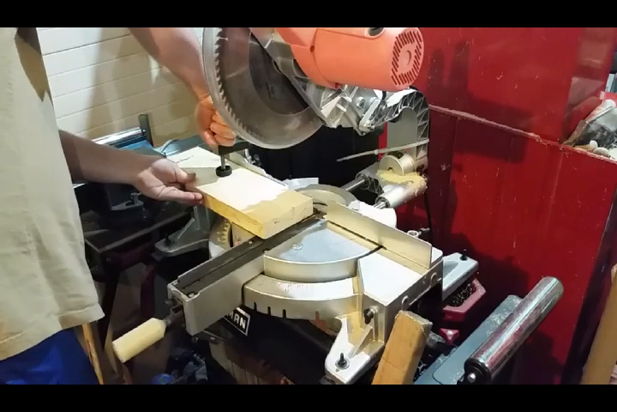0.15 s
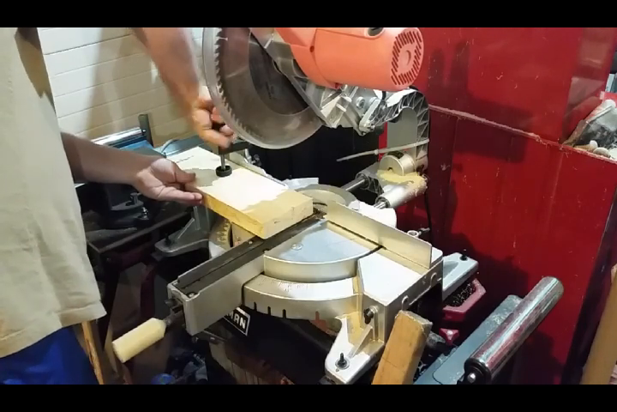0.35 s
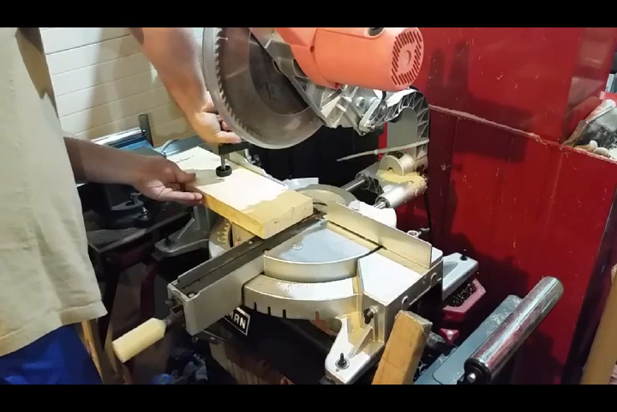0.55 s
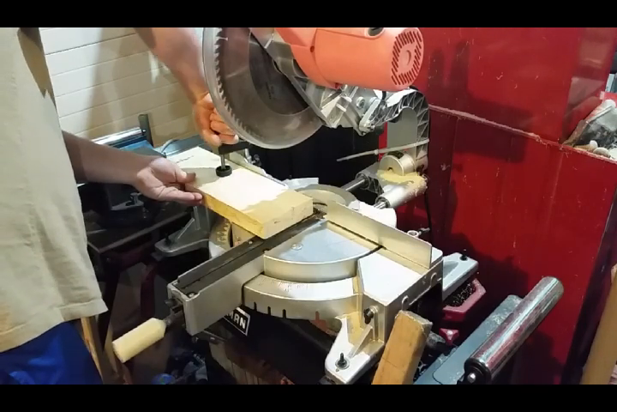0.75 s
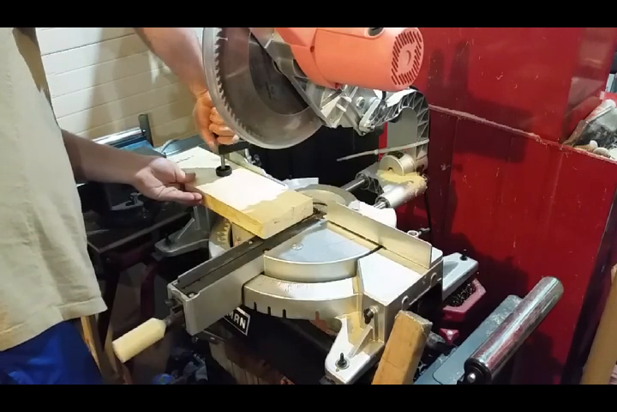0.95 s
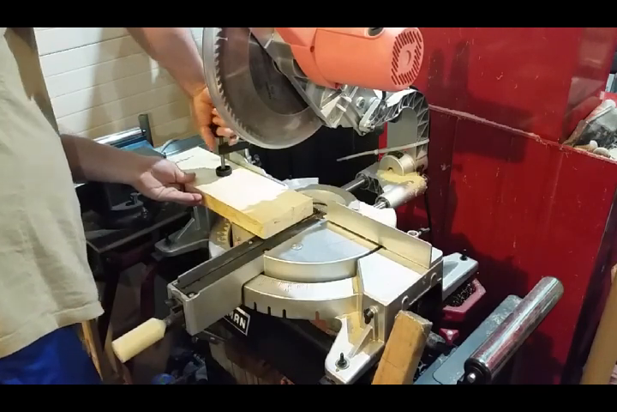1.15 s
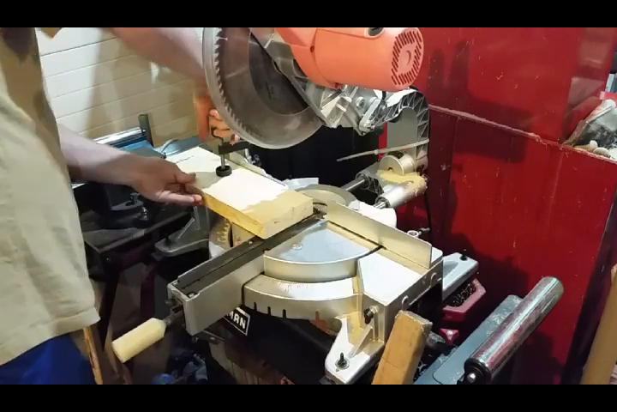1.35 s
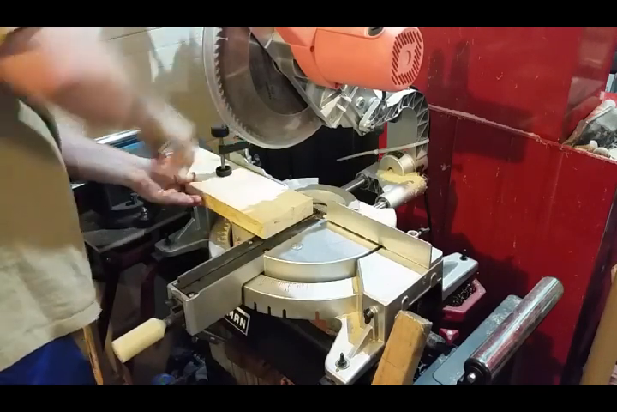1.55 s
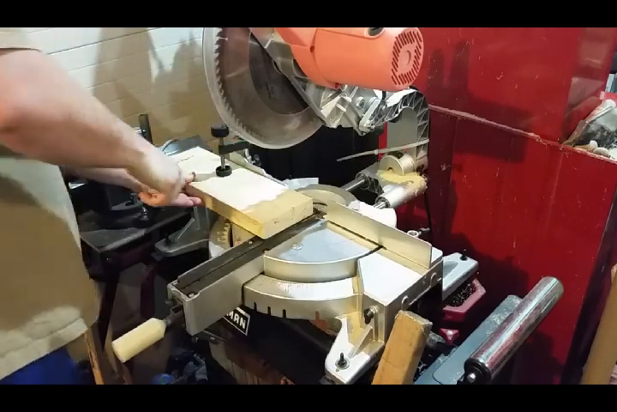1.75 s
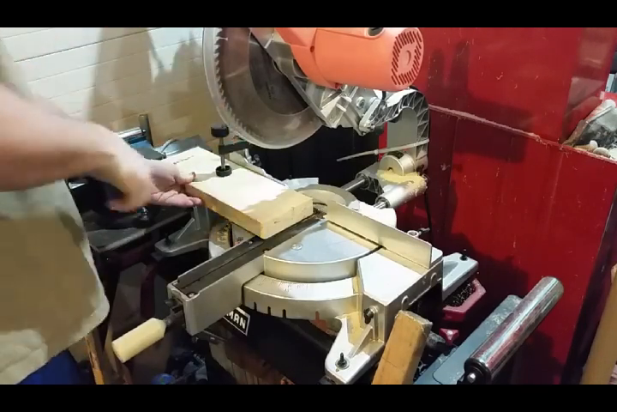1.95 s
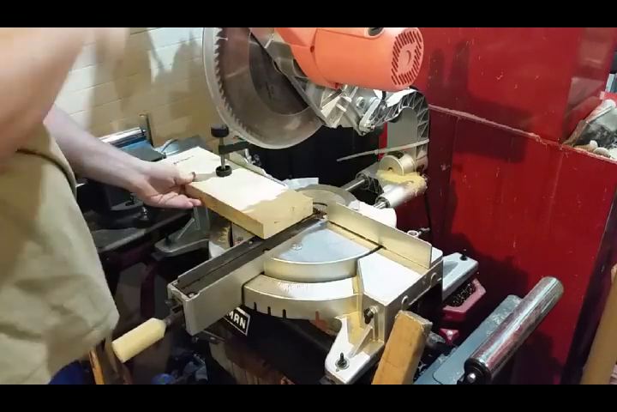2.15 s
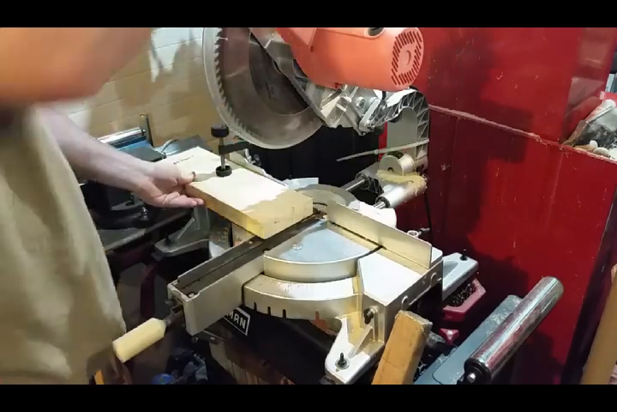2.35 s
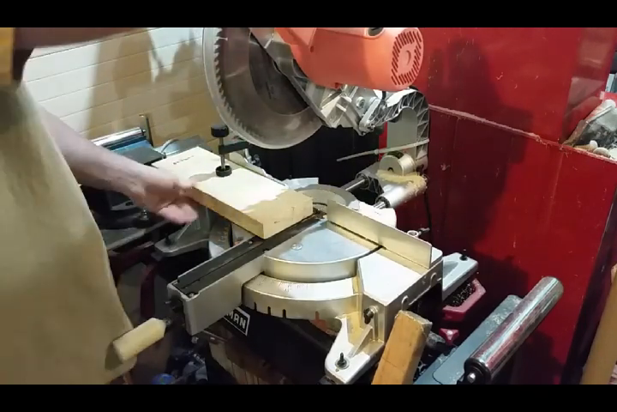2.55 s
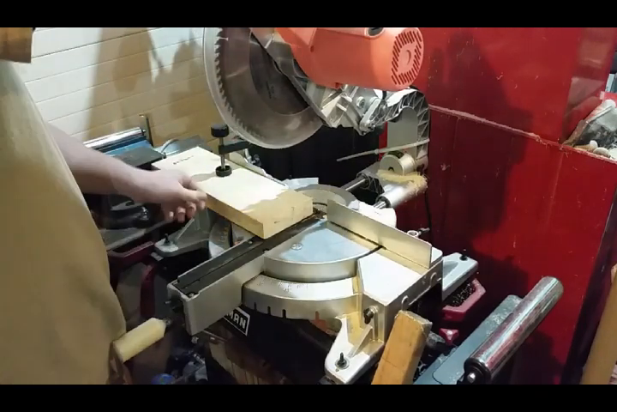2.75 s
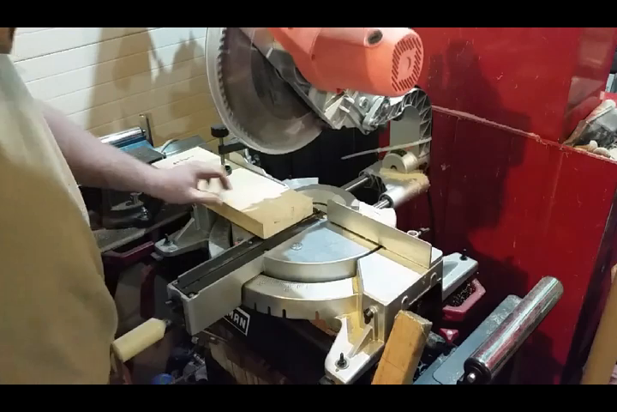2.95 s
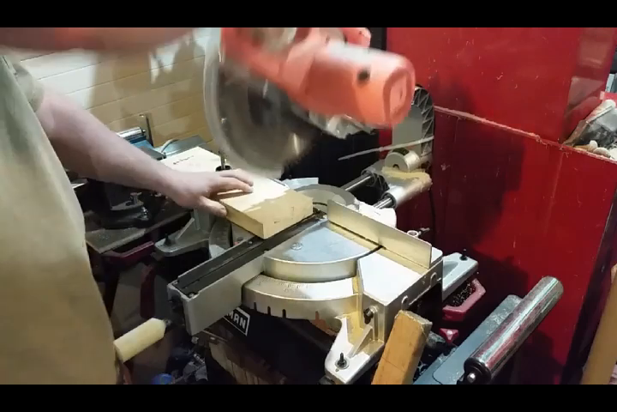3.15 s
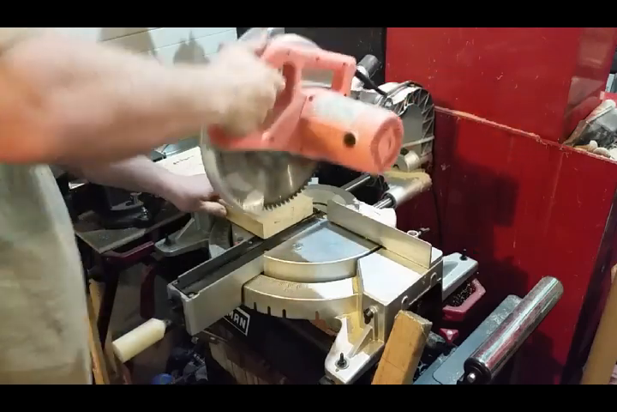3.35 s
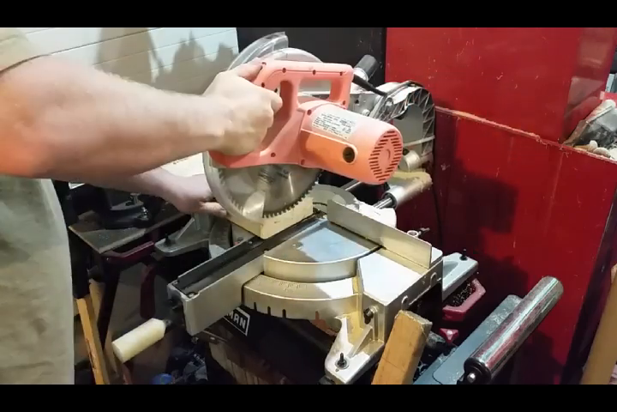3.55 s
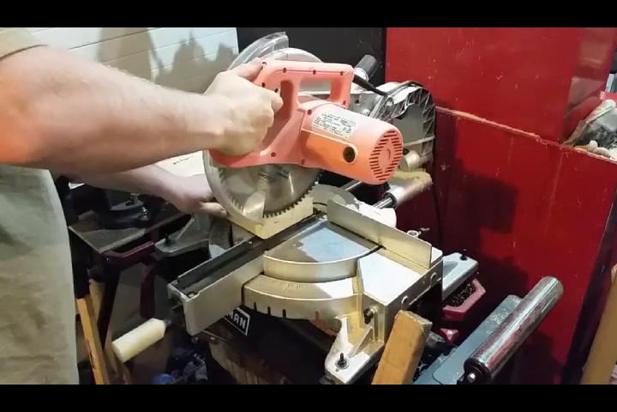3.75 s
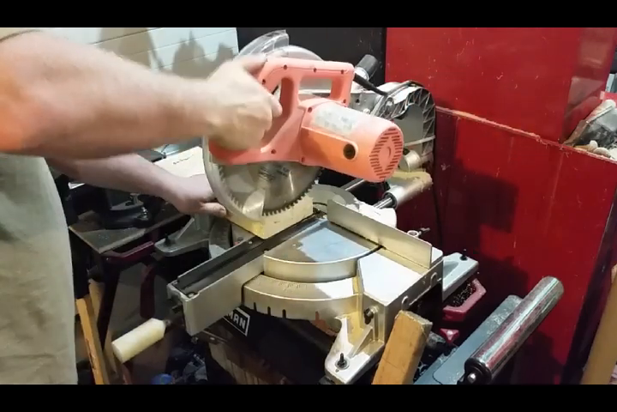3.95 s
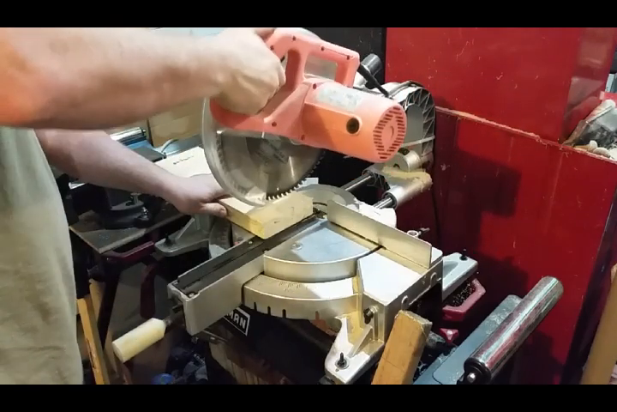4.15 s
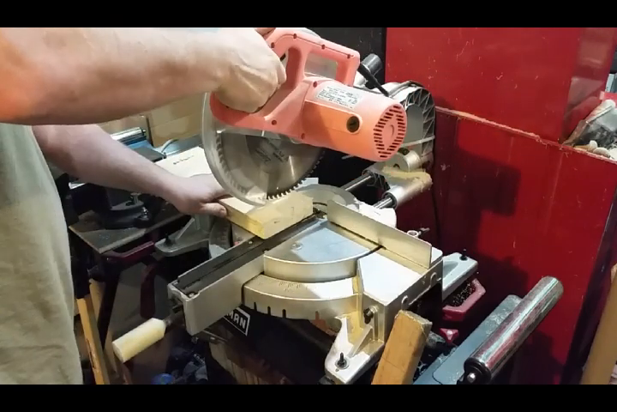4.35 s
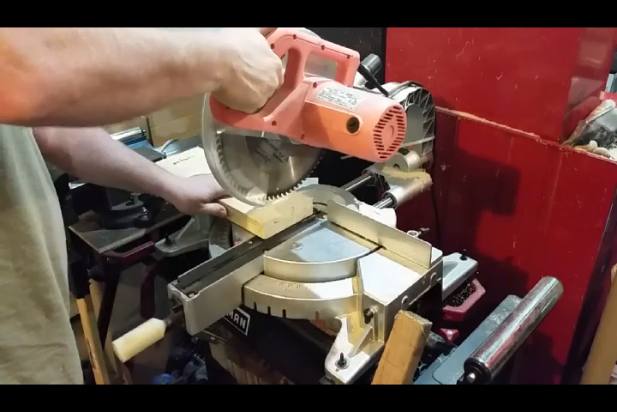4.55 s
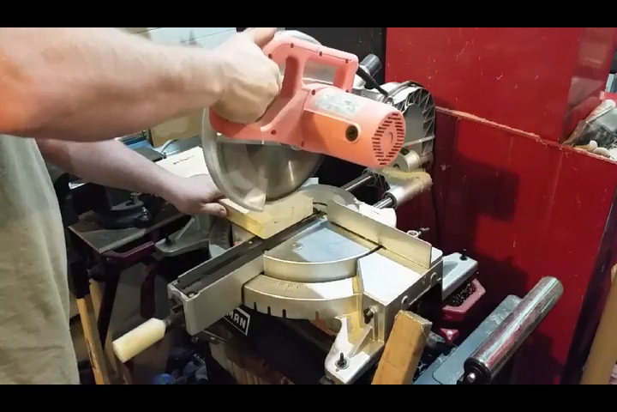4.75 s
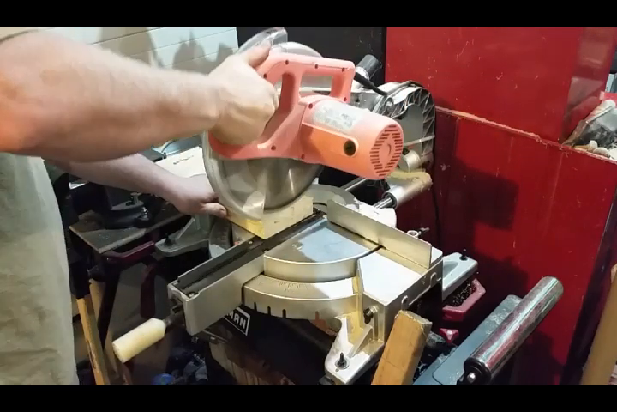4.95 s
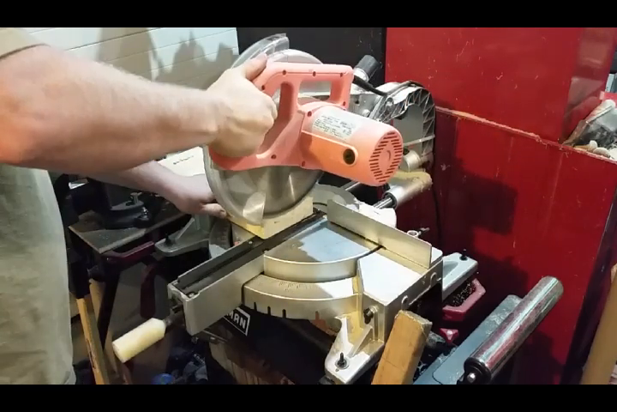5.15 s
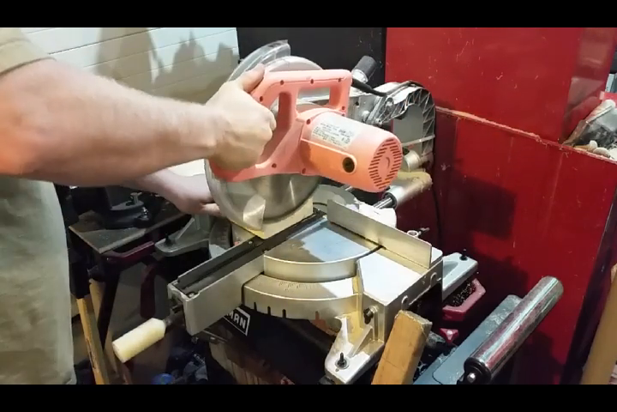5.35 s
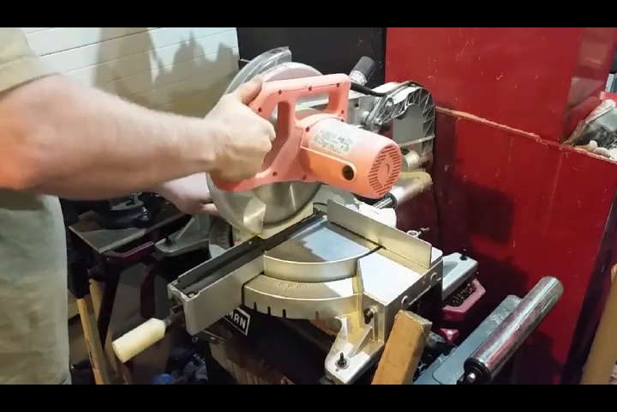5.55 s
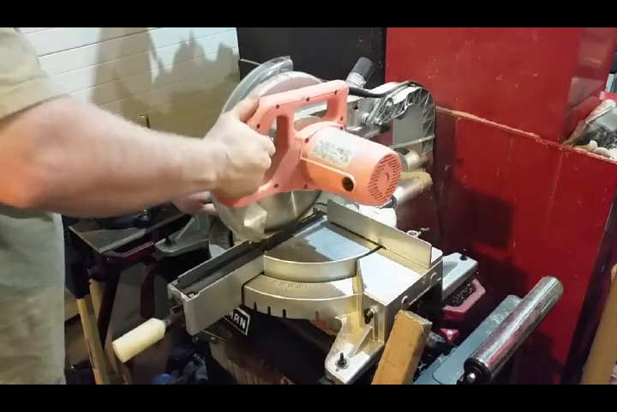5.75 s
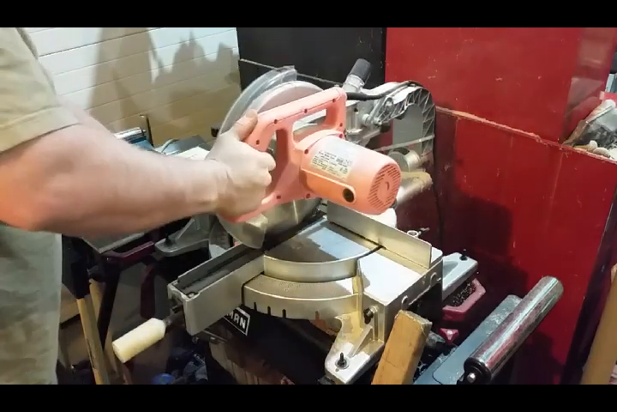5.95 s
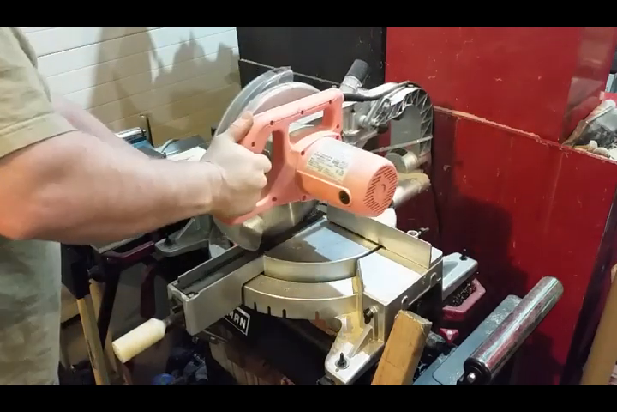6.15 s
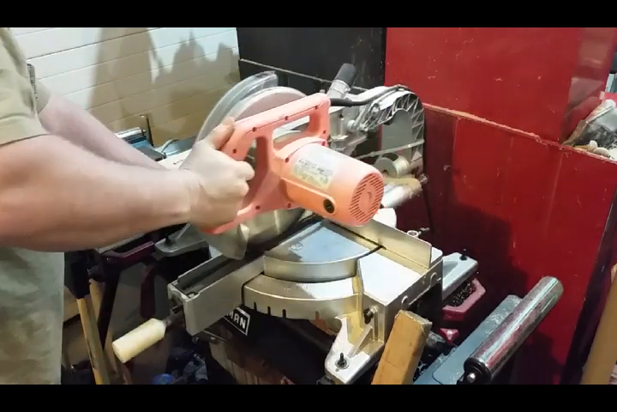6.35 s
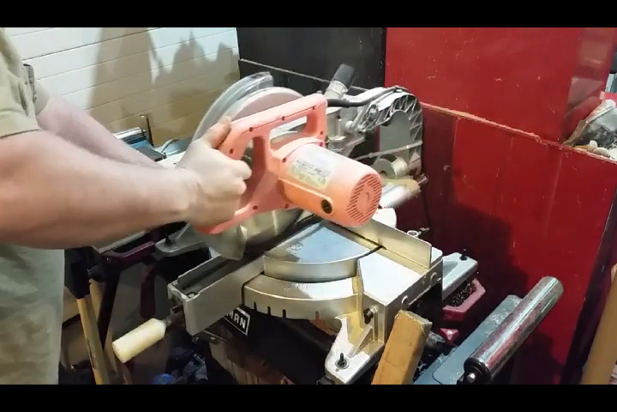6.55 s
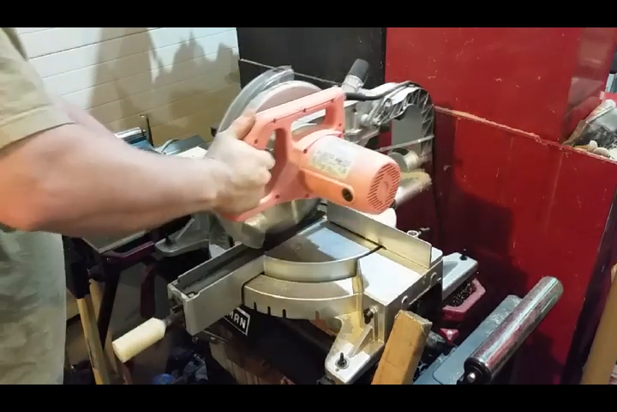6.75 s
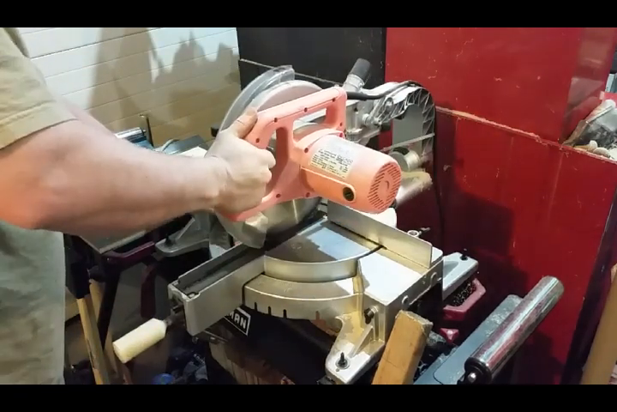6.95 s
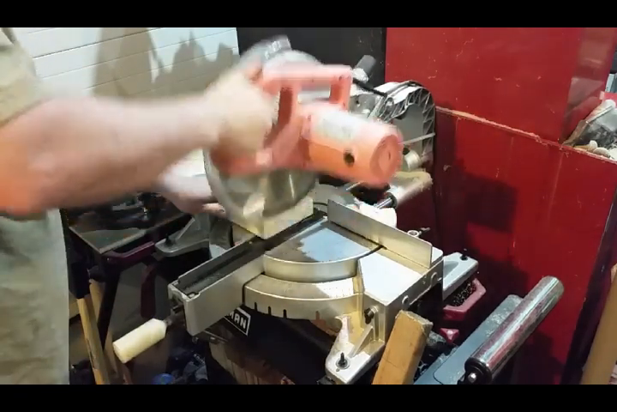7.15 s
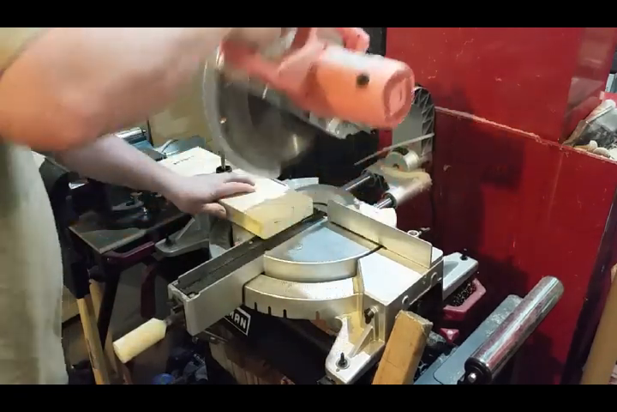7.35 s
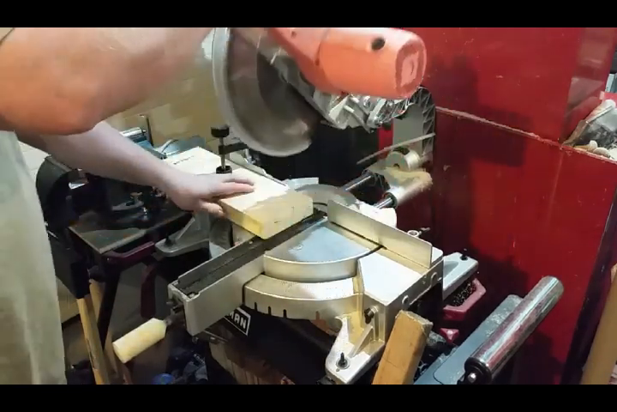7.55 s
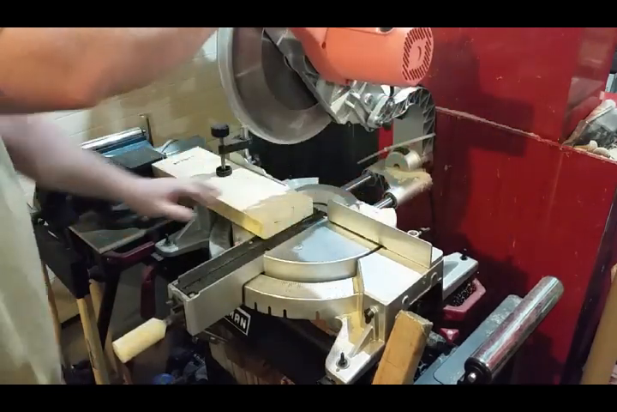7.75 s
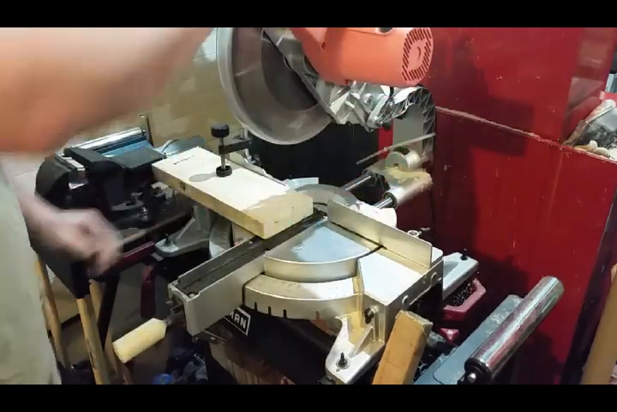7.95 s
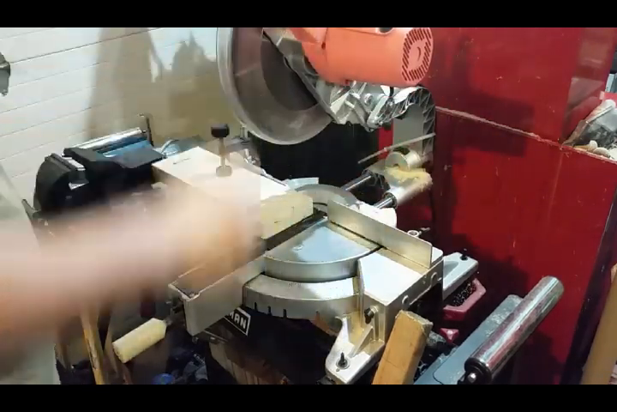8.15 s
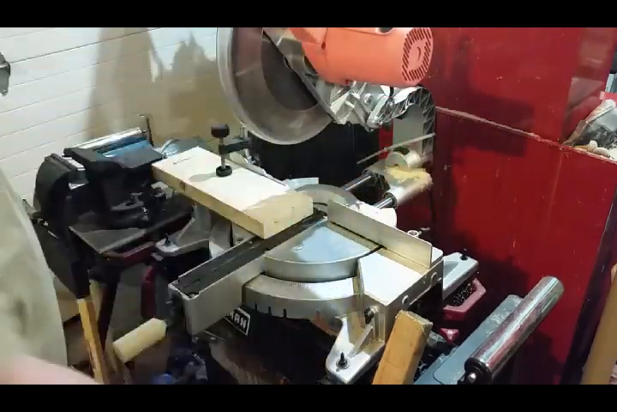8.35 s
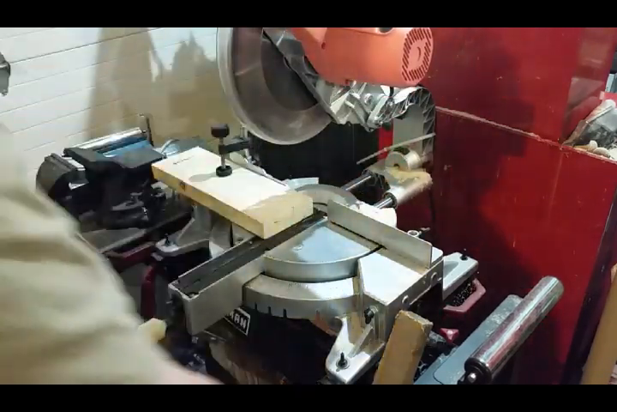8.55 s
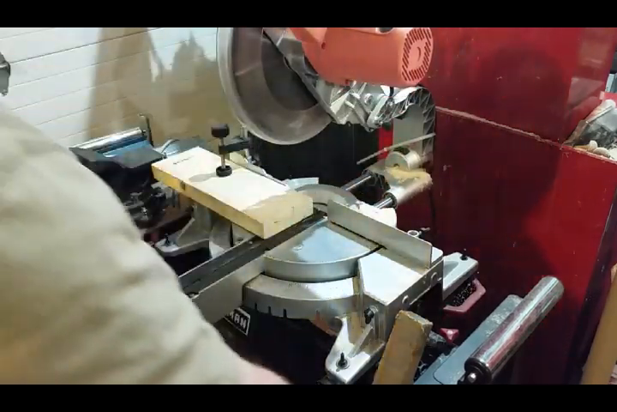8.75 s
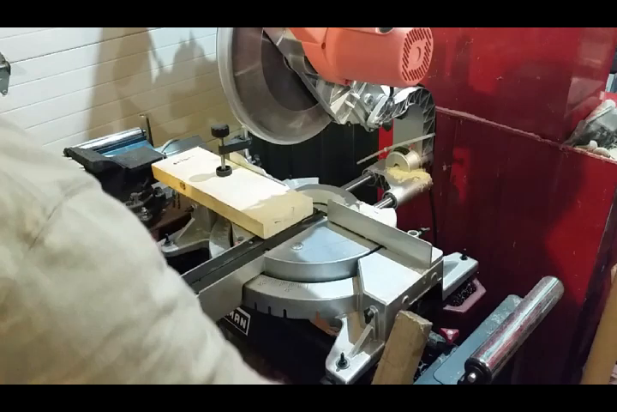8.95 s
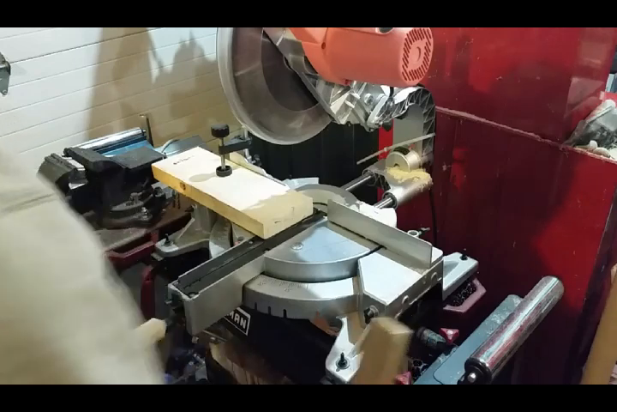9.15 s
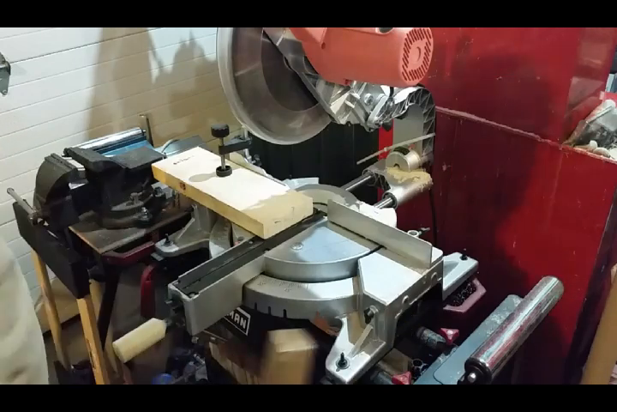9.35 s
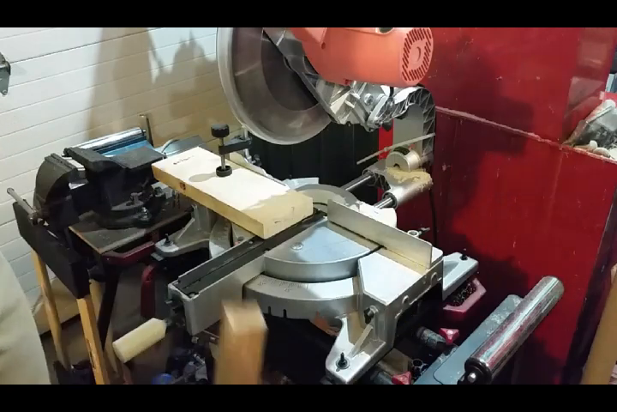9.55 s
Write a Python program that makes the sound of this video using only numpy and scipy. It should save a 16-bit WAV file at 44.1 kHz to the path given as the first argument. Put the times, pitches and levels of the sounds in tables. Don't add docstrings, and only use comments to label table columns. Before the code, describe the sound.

Close stereo pickup in a small hard workshop. Hands softly brush a board, a loose clamp knob chatters briefly, then after a quiet gap the saw head scrapes along rails with metallic ticks. The motor jolts on with a hum and thump, whining and rattling; the blade squeals on contact, tears wood and sings. After release, the gear whine falls, a latch cracks, and slow gears slap the casting.

```python
import sys
import numpy as np
from scipy import signal
from scipy.fft import rfft, irfft, next_fast_len
from scipy.io import wavfile
from scipy.ndimage import uniform_filter1d

SR = 44100
rng = np.random.default_rng(int(sys.argv[2]) if len(sys.argv) > 2 else 0)


def nominal_scale(level):
    x = np.asarray(level, float) / 20
    return 10 ** x


def bounce(signal):
    frames = np.transpose(np.atleast_2d(signal))
    limited = np.clip(frames, -1, 1)
    pcm = np.round(limited * 32767).astype(np.int16)
    wavfile.write(sys.argv[1], SR, pcm)


N = 422841
T = np.arange(N) / SR
START_S, RELEASE_S = 4.69, 7.39
ON = slice(int(START_S * SR), N)
T_ON = T[ON]
PINION_TEETH, WHEEL_TEETH = 7, 43
EDGE_HZ = 14570


def evened(x):
    return x / np.sqrt(np.mean(x ** 2) + 1e-20)


def read(points, hz):
    f, value = np.transpose(points)
    return np.interp(np.log(hz + 1), np.log(f + 1), value)


def curves(rows, off=-140.):
    s, *columns = np.transpose(rows)
    ends_early = s[-1] < T[-1] - .05
    return [np.interp(T, s, c, left=off, right=off if ends_early else c[-1]) for c in columns]


def colour(x, points, modes=(), lift_db=0.):
    size = next_fast_len(x.shape[-1] + SR // 4)
    hz = np.fft.rfftfreq(size, 1 / SR)
    top_db = max([m[2] for m in modes], default=0)
    bumps = 1
    for f, width_hz, db in modes:
        bumps = bumps + nominal_scale(lift_db + .5 * (db - top_db)) ** 2 / (1 + (2 * (hz - f) / width_hz) ** 2)
    return irfft(rfft(x, size) * nominal_scale(read(points, hz)) * np.sqrt(bumps), size)[..., :x.shape[-1]]


def drift(place):
    steps = np.arange(int(place.max()) + 2)
    return np.interp(place, steps, rng.standard_normal(len(steps)))


def swell(place):
    steps = np.arange(int(place.min()), int(place.max()) + 2)
    return np.interp(place, steps, rng.standard_normal((len(steps), 2)) @ [1, 1j])


def throb(turns, depth):
    return 1 + depth * np.cos(2 * np.pi * turns) + .2 * depth * drift(turns * 3)


def arch(centre_s, half_width_s, db=0., t=T_ON):
    return np.maximum(db - 10 * ((t - centre_s) / half_width_s) ** 2, -200)


def summed(levels):
    return 10 * np.log10(sum(nominal_scale(db) ** 2 for db in levels) + 1e-30)


def hump(x, hz, width):
    turn = np.exp(2j * np.pi * np.cumsum(np.maximum(hz, 300)) / SR)
    smooth = signal.lfilter([1], [1, -np.exp(-np.pi * width / SR)], x / turn)
    return evened((turn * smooth).real)


def ringing(knocks, parts, t):
    out = np.zeros(len(t))
    for f, width_hz, s, half_s, db in parts:
        near = abs(t - s) < 2.5 * half_s
        note = hump(knocks[near], np.full(near.sum(), f), width_hz)
        note = evened(note / (uniform_filter1d(note ** 2, size=900) + .05) ** .25)
        out[near] += nominal_scale(arch(s, half_s, db, t[near])) * note
    return out


def wide(same=0.2):
    a, b = rng.standard_normal((2, len(T_ON)))
    return np.array([a, same * a + np.sqrt(1 - same ** 2) * b])


def whole(x):
    return np.pad(x, [(0, 0)] * (x.ndim - 1) + [(N - x.shape[-1], 0)])


# frequency in Hz, level in dB.
QUIET_SPECTRUM = [(12, -41), (20, 1), (61, -19), (87, -10.5), (121, -12.5), (155, -4), (178, -18),
                  (211, -22.5), (256, -15.5), (1350, -43), (2410, -40), (3180, -56), (4820, -34),
                  (6360, -54), (15000, -55)]
# frequency in Hz, level in dB.
FAR_HUM = [(53.8, -78), (150.7, -75.5), (204.6, -80)]


def quiet():
    a, b = rng.standard_normal((2, N))
    out = nominal_scale(-67) * evened(colour(np.array([a + 0.93 * b, a - 0.44 * b]), QUIET_SPECTRUM))
    for hz, db in FAR_HUM:
        out = out + nominal_scale(db + 3.0 + 5.1 * drift(T * 8)) * np.sin(2 * np.pi * hz * T)
    return out


# centre in s, half-width in s, low band in dB, high band in dB.
HANDS = [
    (.27, 0.12, -66.5, -90),
    (.48, 0.068, -65.5, -71),
    (.55, 0.38, -77, -99),
    (2.37, 0.023, -75, -98),
    (2.8, 0.27, -84, -99),
]


def hands():
    t = T[:int(3.2 * SR)]
    low, high = rng.standard_normal((2, len(t)))
    low_db, high_db = (summed(arch(s, w, db[k], t) for s, w, *db in HANDS) for k in (0, 1))
    low = evened(colour(low, [(150, -20), (250, -3), (600, 2), (880, 2), (1100, -28)]))
    high = evened(colour(high, [(1150, -17), (1400, 7), (1750, 5), (2100, -19)]))
    out = nominal_scale(low_db - 5.5) * low + nominal_scale(high_db - 5.5) * high
    return np.pad(out, (0, N - len(t)))


# time in s, level in dB.
KNOB = [
    (0.884, -34),
    (0.904, -35),
    (0.974, -41),
    (1.152, -71.5),
    (1.3, -77),
    (1.5, -100),
]
# frequency in Hz, level in dB.
KNOB_COLOUR = [(120, -40), (200, -20), (262, -18), (540, -5), (602, -12), (671, -4.5), (1090, -7),
               (1200, -7), (2000, -13.5), (3500, -13), (5660, -4.5), (7020, -14.5), (14000, -5.5),
               (15000, -29)]


def knob():
    t = T[:int(3.2 * SR)]
    chatter = rng.standard_normal(len(t)) * nominal_scale(2.0 * drift(t * 600))
    out = evened(colour(chatter, KNOB_COLOUR)) * nominal_scale(curves(KNOB)[0][:len(t)])
    return np.pad(out, (0, N - len(t)))


# time in s, level in dB.
SLIDES = [
    [(2.85, -90), (2.865, -68), (2.982, -67), (2.99, -42.5), (3.1, -47.5), (3.2, -38.5), (3.28, -36.5),
     (3.418, -38.5), (3.542, -44.5), (3.66, -49.5), (3.8, -48), (3.88, -61), (4.085, -79)],
    [(4.085, -89), (4.116, -52.5), (4.27, -36.5), (4.442, -66.5), (4.68, -80)],
]
# frequency in Hz, level in dB.
RAILS = [
    [(35, -32), (60, -7), (234, -5.5), (339, -13.5), (663, -13), (1130, -15), (2420, -13.5), (10600, -50), (14000, -33), (15000, -50)],
    [(35, -47), (60, -8), (246, -7), (347, -13), (648, -10), (1420, -4), (2710, -5.5), (8230, -32), (9670, -63), (15000, -46)],
]
# frequency in Hz, width in Hz, level in dB.
RAIL_MODES = [
    [(360, 53, -2), (557, 27, -16), (1040, 160, 3), (1650, 44, -34), (1920, 39, -19), (2320, 37, -9), (3700, 76, -3), (4710, 170, -26)],
    [(348, 30, -3), (1440, 110, -3), (2500, 97, -13), (2900, 110, -2), (3260, 47, -4), (5300, 480, -6)],
]
SCRAPE_HZ = (1250, 2420)
HISS_DB = (-23, -38)
# centre in s, half-width in s, level in dB.
LURCHES = [(2.94, 0.032, -62), (3.045, 0.037, -43.5), (3.16, .03, -44), (3.215, 0.013, -46),
           (3.27, 0.044, -54), (3.41, 0.028, -48), (3.58, .03, -51), (3.69, 0.052, -50), (3.77, .03, -52),
           (3.83, 0.041, -54), (4.105, 0.012, -50), (4.29, 0.023, -51), (4.2, .15, -75)]
# frequency in Hz, width in Hz, centre in s, half-width in s, level in dB.
RAIL_RINGS = [(2400, 81, 3.24, 0.017, -50), (1890, 57, 3.31, 0.023, -37.5), (2430, 140, 3.42, .09, -46),
              (13000, 2600, 3.0, 0.028, -60), (850, 140, 3.27, 0.043, -47), (1160, 150, 3.26, 0.044, -41.5),
              (1310, 240, 3.34, 0.037, -42), (3670, 180, 3.46, .02, -53), (13500, 2500, 3.645, 0.017, -54),
              (13000, 2400, 3.2, .03, -54)]
# frequency in Hz, level in dB.
CASTING = [(280, -50), (325, -8), (350, 1), (385, 1), (430, -10), (540, -26), (700, -50)]


def slides():
    out = np.zeros(N)
    hiss_colour = [(2500, -30), (5000, 15), (7000, -12), (10000, -27), (13500, -6)]
    for rows, rail, modes, hz, hiss_db in zip(SLIDES, RAILS, RAIL_MODES, SCRAPE_HZ, HISS_DB):
        on = slice(int(rows[0][0] * SR), int(rows[-1][0] * SR))
        push_db, t = curves(rows)[0][on], T[on]
        grit = rng.standard_normal(len(t)) * nominal_scale(1.5 * drift(t * 300))
        scrape = evened(colour(grit, rail, modes, lift_db=10.5))
        scrape += 0.12 * hump(grit, np.full(len(t), hz), width=420.0)
        out[on] += nominal_scale(push_db - 1.5) * scrape
        out[on] += nominal_scale(push_db + hiss_db) * evened(colour(grit, hiss_colour))
        out[on] += ringing(grit, [r for r in RAIL_RINGS if t[0] < r[2] < t[-1]], t)
        out[on] += nominal_scale(summed(arch(*row, t) for row in LURCHES)) * evened(colour(grit, CASTING))
    return out


# time in s, peak in dB, ring in Hz.
TICKS = [(2.991, -33.5, 560), (3.029, -39, 350), (3.572, -33, 1250), (3.672, -31.5, 1320),
         (3.717, -32, 1130), (3.764, -36, 1090), (3.805, -39.5, 992), (3.983, -56, 870), (4.092, -55, 915),
         (4.114, -47, 2990), (7.79, -17, 1088)]


def ticks():
    out, t = np.zeros(N), np.arange(4000) / SR
    for s, db, hz in TICKS:
        crack = rng.standard_normal(len(t)) * (0.63 * np.exp(-t / 0.005) + 0.73 * np.exp(-t / 0.018))
        ring = 0.35 * np.sin(2 * np.pi * hz * t) * np.exp(-t / 0.015)
        ring += 0.065 * np.sin(2 * np.pi * 360 * t) * np.exp(-t / 0.029)
        at = round(s * SR)
        out[at:at + len(t)] += nominal_scale(db + 5.5) * (crack + ring) * np.minimum(t / .0015, 1)
    return colour(out, [(150, -5.5), (400, 4.0), (800, -3.5), (1300, -1.0), (1900, -10.5),
                        (2800, -13.5), (6000, -19), (14000, -33)])


def mesh():
    run_hz, climb_hz_per_s, lag_hz, wind_up_s = 1742, 254, 1500, .277
    let_go_s, creep_hz, coast_s, brake_s, brake_share = 7.38, 305, .721, .127, .079
    driven_s = np.clip(T, START_S, let_go_s) - START_S
    free_s = np.maximum(T - let_go_s, 0)
    hz = run_hz + climb_hz_per_s * driven_s - lag_hz * np.exp(-driven_s / wind_up_s)
    slowing = (1 - brake_share) * np.exp(-free_s / coast_s) + brake_share * np.exp(-free_s / brake_s)
    return creep_hz + (hz - creep_hz) * slowing


def coasting(fade_s):
    return np.clip((T_ON - RELEASE_S) / fade_s, 0, 1)


def layer(mesh_hz, run_db, kick_db, fade_s, db_per_bite_db, coast_db, db_per_octave):
    load_db = np.maximum(np.interp(T_ON, *np.transpose(BITE)) + 31, 0)
    driven_db = run_db + kick_db * np.exp(-(T_ON - START_S) / fade_s) + db_per_bite_db * load_db
    free_db = coast_db + db_per_octave * np.log2(mesh_hz.max() / mesh_hz)
    gain = nominal_scale(driven_db + coasting(0.021) * (free_db - driven_db))
    return gain * np.clip((T_ON - START_S - .002) / 0.011, 0, 1)


# multiple of the mesh, driven level in dB, coasting level in dB.
MESH_ORDERS = [(1, 4.5, 1), (2, -6.5, -1.5), (3, -12, -1.5), (4, -13, 3.5), (5, -24, -1.5), (6, -32, -7.5),
               (7, -22, -11.5), (8, -27, -9.5), (9, -19, -9.5), (10, -28, -10), (11, -21, -19),
               (12, -24, -9.5)]
# multiple, centre in s, half-width in s, extra dB.
WHINE_SWELLS = [(1, 4.8, 0.066, -7), (2, 4.95, 0.07, 13.5), (4, 7.5, 0.094, -9), (5, 8.55, .1, -5),
                (5, 8.2, 0.27, -5), (4, 8.1, 0.14, 2), (4, 5.04, .04, 3), (1, 4.7, 0.12, 4),
                (1, 5.07, 0.059, 10.5), (1, 5.185, 0.066, 11.5), (1, 7.34, 0.054, 7.5), (1, 6.5, .15, -5),
                (1, 6.9, 0.21, 0), (2, 7.52, 0.2, 5.5), (5, 8.3, .2, 7), (6, 7, .3, 8), (7, 7.6, 0.33, 7.5),
                (8, 7.9, 0.25, 3), (5, 8.75, 0.22, 0), (1, 8.38, 0.084, 4), (1, 8.9, 0.12, 1),
                (2, 5.18, .04, 1), (2, 7.23, 0.42, 4), (2, 8.85, 0.35, 7), (3, 7.5, 0.18, 7.5),
                (3, 7.94, 0.33, -3.5), (4, 5.0, 0.035, 8), (4, 5.1, .03, -2), (1, 5.27, 0.043, 1),
                (1, 6.22, 0.17, 4), (1, 6.65, .06, 5), (4, 5.5, 0.066, -6), (4, 7.68, 0.091, 1),
                (3, 7.62, 0.1, -9), (4, 7.5, .2, 4), (4, 6.8, 0.11, 0)]
# frequency in Hz, level in dB.
WHINE_PATH = [(200, -6), (350, -0.5), (550, -2.5), (650, -11.5), (800, 3), (1100, 2.5), (1400, 0),
              (1900, -0.5), (2400, 1.5), (4000, 0), (6500, 3), (8500, 4), (11000, 21), (15000, -14)]
# frequency in Hz, width in Hz, level in dB.
GEARBOX_MODES = [(370, 45, -19), (567, 19, 2), (773.5, 31, 6), (1388, 60, -7.5), (1510, 76, -21),
                 (2324, 214, -11), (3020, 180, -2), (4064, 76, -6.5), (6340, 1330, 0.5)]
# running dB, start kick in dB, kick fade in s, dB per dB of bite, coasting dB, dB per octave slower.
WHINE_GAIN = (-37.5, 0.5, 3.7, -0.17, -37.5, 1.6)


def gear_whine(mesh_hz, teeth):
    coast = coasting(0.012)
    load = np.clip((T_ON - 5.25) / .3, 0, 1) * (1 - coast)
    turn, order, whine = np.exp(2j * np.pi * teeth), 1, np.zeros(len(T_ON))
    dull = nominal_scale(-0.0467 * coast * np.log2(mesh_hz.max() / mesh_hz))
    for k, driven_db, coast_db in MESH_ORDERS:
        order = order * turn * dull
        line = (1.25 - .45 * load - .2 * coast) / (1 + (k / 6) ** 4)
        wear = line * np.exp(1j * (.8 + .1 * k + load) * drift(teeth / 14))
        wear += (.1 + .3 * load) * swell(teeth / 25)
        wear += (.1 + .45 * load + .15 * coast) * swell(teeth / 9)
        wear += (.28 + .17 * load) * swell(teeth / 2.5)
        level = nominal_scale(driven_db) + coast * (nominal_scale(coast_db) - nominal_scale(driven_db))
        level *= k * mesh_hz < EDGE_HZ
        level *= nominal_scale(sum(db * nominal_scale(arch(s, w)) for m, s, w, db in WHINE_SWELLS if round(m) == k))
        level *= nominal_scale(5 * coast * min(k - 1, 1) * (.5 - abs(drift((T_ON - START_S) * 55))))
        whine += level * (wear * order).real
    whine *= throb(teeth / PINION_TEETH, .45)
    whine *= throb(teeth / WHEEL_TEETH, .45 + .25 * load - .05 * coast)
    whine *= nominal_scale(1.2 * (1 - coast) * drift(teeth / 120))
    return colour(whine * layer(mesh_hz, *WHINE_GAIN), WHINE_PATH, GEARBOX_MODES, lift_db=14)


def gear_knocks(teeth):
    knocks = rng.standard_normal(len(teeth)) * nominal_scale(1.4 * drift(teeth) + .3 * drift(teeth / 6))
    return knocks * throb(teeth / WHEEL_TEETH, .15) * throb(teeth / PINION_TEETH, 0.47)


# frequency in Hz, level in dB.
HOUSING = [(35, -65), (60, -21), (240, -30), (355, -5), (619, -15), (798, -12.5), (1210, -13),
           (1390, -16.5), (3340, -32.5), (6090, -47), (10600, -78), (14000, -75), (15000, -23)]
# frequency in Hz, width in Hz, level in dB.
HOUSING_MODES = [(375.5, 144, -23), (752, 26, 24.5), (1410, 53, 7), (1710, 25, -22), (2096, 106, 30),
                 (2203, 77, -17), (2930, 170, 17), (4167, 44, -2), (5700, 440, 39.5), (5740, 55, 10)]
# running dB, start kick in dB, kick fade in s, dB per dB of bite, coasting dB, dB per octave slower.
RATTLE_GAIN = (-27, 13.5, 0.09, -1.0, -42.5, 8.5)


def housing_rattle(knocks, mesh_hz):
    rattle = evened(colour(knocks, HOUSING, HOUSING_MODES, lift_db=14.5)) * layer(mesh_hz, *RATTLE_GAIN)
    loosening_db_per_s = 3.5
    return rattle * nominal_scale(-4.5 + (1 - coasting(0.012)) * loosening_db_per_s * np.maximum(T_ON - 6, 0))


# frequency in Hz, level in dB.
AIR = [(180, -2.5), (300, -10), (353, -7.5), (637, -11), (1290, -10), (1420, -12), (1880, -9), (2400, -9.5),
       (2730, -8), (6510, -12.5), (7920, -18), (13800, -9), (15000, -21.5)]
# running dB, start kick in dB, kick fade in s, dB per dB of bite, coasting dB, dB per octave slower.
FAN_GAIN = (-23.5, 29.5, 0.1455, 0.4353, -18.5, -3)


def fan_air(mesh_hz, teeth):
    air = evened(colour(wide() * throb(teeth / PINION_TEETH, 0.074), AIR, GEARBOX_MODES, lift_db=5.5))
    return air * layer(mesh_hz, *FAN_GAIN) * nominal_scale(-2.0) * np.clip((T_ON - START_S) / 0.26, .05, 1) ** 2.3


# frequency in Hz, level in dB.
GUARD = [(1800, -19.5), (2250, -5), (2430, 1.5), (2620, -17), (3200, -26), (4800, -23), (5500, -26),
         (6000, -41), (6600, -12), (7200, -45)]
# centre in s, half-width in s, level in dB.
GUARD_RING = (4.95, 0.15, -21)


def guard_ring(knocks):
    return evened(colour(knocks, GUARD)) * nominal_scale(arch(*GUARD_RING))


def casting_boom(knocks, mesh_hz, teeth):
    note_hz, width_hz = 407, 60
    boom = evened(colour(knocks * throb(teeth / (2 * PINION_TEETH), 0.28), CASTING)) * coasting(0.012)
    return boom * (nominal_scale(-85) + nominal_scale(-25) / (1 + ((mesh_hz - note_hz) / width_hz) ** 2))


# frequency in Hz, width in Hz, centre in s, half-width in s, dB.
RINGING = [(400, 330, 4.8, 0.11, -24.5), (390, 100, 5.11, .1, -29), (787, 14, 8.47, 0.21, -28),
           (551, 63, 10, 0.15, -38), (6070, 300, 7.6, 0.43, -34), (800, 55, 9.15, 0.44, -33.5),
           (1366, 60, 9.2, 0.12, -33), (2920, 110, 12, 0.16, -29), (2990, 120, 8.76, 0.11, -29),
           (2920, 110, 9.06, 0.14, -33), (2990, 94, 9.42, 0.15, -36), (355, 65, 8.95, 0.15, -36),
           (1130, 23, 8.1, 0.15, -41), (1400, 140, 4.96, 0.11, -27.5), (5400, 110, 5.04, 0.061, -29.5),
           (6480, 220, 5.16, 0.074, -26.5), (3250, 180, 5.17, 0.038, -23.5), (3910, 110, 5.53, 0.11, -29),
           (3950, 95, 6.58, 0.25, -34), (4220, 60, 7.3, 0.11, -42), (3700, 50, 6.25, .05, -39),
           (4060, 61, 10, .05, -35), (4010, 100, 9.0, 0.17, -33.5), (2180, 77, 9.8, 0.072, -27.5),
           (2460, 120, 8.72, .06, -37), (2350, 96, 9.18, .07, -40), (1764, 120, 9.3, 0.093, -25.5),
           (1370, 110, 9.4, 0.16, -31), (2040, 62, 9.56, 0.019, -29), (3650, 52, 9.56, .03, -34)]
# centre in s, half-width in s, change in dB.
DUCK = (5.3, 0.069, -4.5)


def motor(mesh_hz, teeth):
    knocks = gear_knocks(teeth)
    out = gear_whine(mesh_hz, teeth) + housing_rattle(knocks, mesh_hz) + guard_ring(knocks)
    out = out + casting_boom(knocks, mesh_hz, teeth) + fan_air(mesh_hz, teeth)
    centre_s, half_width_s, dip_db = DUCK
    return (out + ringing(knocks, RINGING, T_ON)) * nominal_scale(dip_db * nominal_scale(arch(centre_s, half_width_s)))


# centre in s, half-width in s, level in dB.
HUM = (4.83, 0.26, -34.5)
# centre in s, half-width in s, level in dB.
HUM_TAIL = (5.15, 0.19, -45.5)
# centre in s, half-width in s, level in dB.
THUMP = (4.78, 0.12, -34)
# centre in s, half-width in s, level in dB.
SHAFT = (8.42, 0.28, -44.5)
# frequency in Hz, level in dB.
BENCH_TOP = [(20, -40), (50, -19), (72, -15), (100, -1), (180, 0), (240, -3.5), (320, -32.5)]
# running dB, start kick in dB, kick fade in s, dB per dB of bite, coasting dB, dB per octave slower.
RUMBLE_GAIN = (-51, 19, 0.58, -4, -60.5, 5)


def bass(teeth, mesh_hz):
    since_s = T_ON - START_S
    hum = nominal_scale(summed([arch(*HUM) + 6.2, arch(*HUM_TAIL)])) * np.sin(2 * np.pi * 119.6 * T_ON)
    hum *= np.clip(since_s / 0.056, 0, 1)
    thump = nominal_scale(arch(*THUMP)) * np.sin(2 * np.pi * 72 * T_ON) * np.clip(since_s / 0.022, 0, 1)
    shake = evened(colour(rng.standard_normal(len(T_ON)), BENCH_TOP))
    shake *= layer(mesh_hz, *RUMBLE_GAIN) * nominal_scale(4.5 * drift(T_ON * 9))
    unbalance = nominal_scale(arch(*SHAFT)) * np.sin(2 * np.pi * teeth / PINION_TEETH)
    return whole(hum + thump + shake + unbalance)


# time in s, level in dB.
BITE = [(4.69, -47.5), (4.88, -39), (5.18, -30), (5.25, -22), (5.36, -28.5), (5.44, -26), (5.49, -25),
        (5.58, -26), (5.74, -23), (5.97, -27), (6.19, -50), (6.37, -28), (6.6, -27.5), (6.91, -34),
        (7.19, -35), (7.27, -24.5), (7.4, -31.5), (9.59, -73)]
# frequency in Hz, level in dB.
WOOD = [(590, -88), (1000, -23), (1210, 2), (1510, -6.5), (2240, -41), (3460, -5), (3970, -1.5), (4290, 0),
        (5460, -5.5), (9860, 8.5), (13900, 13.5), (14700, 3), (15200, -25)]
# time in s, frequency in Hz, level in dB.
SQUEAL = [
    (5.2, 12200, -56),
    (5.24, 12100, -38),
    (5.3, 13070, -25),
    (5.36, 13600, -16),
    (5.41, 14900, -47),
]


def tear(teeth):
    tearing = wide() * nominal_scale(2.8 * drift(T_ON * 900)) * throb(teeth / WHEEL_TEETH, 0.34)
    out = evened(colour(tearing, WOOD)) * nominal_scale(curves(BITE)[0][ON] + 7.5)
    squeal_hz, squeal_db = curves(SQUEAL)
    return out + nominal_scale(squeal_db[ON]) * hump(tearing[0], squeal_hz[ON], width=64.0)


# frequency in Hz, level in dB.
PLUNGE = [(780.6, -38), (1238, -32), (1588, -44), (2659, -40), (2934, -43), (3225, -37), (3644, -39),
          (3876, -41), (4054, -39), (4522, -42), (5259, -41), (5486, -41), (5712, -43), (7235, -42),
          (8436, -42), (8732, -45), (9055, -48), (9442, -49), (10325, -44), (11558, -43), (12016, -44),
          (12538, -41), (12737, -40), (13049, -40), (13722, -42), (13857, -35)]
# frequency in Hz, level in dB.
PUSH = [(3924, -42), (4118, -43), (5620, -48), (6282, -47), (6799, -47), (7779, -48), (8387, -46),
        (9109, -48), (9480, -46), (10293, -50), (10471, -50), (11434, -42), (11779, -47), (12107, -43),
        (12225, -44), (12430, -44), (12834, -37), (13162, -43), (13722, -43), (14212, -41), (14303, -41),
        (14454, -47)]
# centre in s, half-width in s, low modes in dB, high modes in dB.
SING = [
    (5.3, 0.084, -34, 2),
    (5.6, 0.22, 1.5, 0.5),
    (6.65, 0.3, 1, 4),
    (7.3, 0.12, -1, -1),
]
BRIEF = {781: (5.72, .1), 2659: (5.7, .08), 3225: (5.53, .17), 3644: (5.71, .06), 4522: (5.56, .06),
         5259: (5.7, .06), 5486: (5.71, .06)}


def blade_song():
    bite_db = curves(BITE)[0][ON]
    drives = []
    for band in (0, 1):
        sing_db = summed(arch(s, w, db[band]) for s, w, *db in SING)
        drives.append(whole(nominal_scale(uniform_filter1d(bite_db + sing_db, size=1500) + 32.0)))
    low, high = drives
    song = np.zeros(N)
    deep = np.clip((T - 6.15) / .1, 0, 1)
    for modes, share, t0, t1 in ((PLUNGE, 1 - deep, 5.1, 6.25), (PUSH, deep, 6.15, 7.8)):
        on = slice(int(t0 * SR), int(t1 * SR))
        t = T[on]
        for hz, db in modes:
            drive = (low if hz < 4700 else high)[on] * share[on]
            if round(hz) in BRIEF:
                drive = drive * nominal_scale(arch(*BRIEF[round(hz)], 1., t))
            swing = 1 + (.1 + hz / 7000) * swell(t * (10 + hz / 120))
            tone = (swing * np.exp(2j * np.pi * hz * t)).real
            song[on] += nominal_scale(db) * (.72 + hz / 80000) * drive * tone
    return song


# time in s, peak in dB.
SLAPS = [(8.93, -14), (9, -8.5), (9.067, -8), (9.149, -11), (9.209, -20), (9.337, -18), (9.368, -7),
         (9.399, -5), (9.434, -18), (9.466, -5), (9.498, -7), (9.557, -9)]
# frequency in Hz, level in dB, t60 in s.
SLAP_MODES = [(355, 0, 0.099), (420, -5.5, 0.073), (781, -8, .05), (1390, -7, .04)]


def slaps():
    out, t = np.zeros(N + 6000), np.arange(6000) / SR
    for s, db in SLAPS:
        ring = 0
        for f, mode_db, t60 in SLAP_MODES:
            p = rng.random()
            ring = ring + nominal_scale(mode_db - 60 * t / t60) * np.sin(2 * np.pi * (f * (.98 + 0.042 * p) * t + p))
        out[round(s * SR):][:len(t)] += nominal_scale(db - 7.5) * ring * np.minimum(t / .004, 1)
    return out[:N]


# frequency in Hz, likeness 0 to 1.
SAME = [(60, .9), (300, .8), (700, .5), (1500, .2), (3000, 0), (14000, 0)]
# frequency in Hz, t60 in s.
ROOM = [(100, .3), (1000, .28), (5000, .2), (14000, .15)]
# frequency in Hz, level in dB.
WET = [(100, -5), (1000, -3), (4000, -2), (14000, -2)]


def room(x):
    hz, t, z = signal.stft(rng.standard_normal((2, SR // 2)), SR, nperseg=256)
    same = np.clip(read(SAME, hz), 0, 1)[:, None]
    z[1] = same * z[0] + np.sqrt(1 - same ** 2) * z[1]
    t60 = read(ROOM, hz)[:, None]
    decay = nominal_scale(read(WET, hz)[:, None] - 60 * t / t60) / np.sqrt(t60)
    tail = signal.istft(z * decay, SR, nperseg=256)[1]
    tail *= np.sqrt(6 * np.log(10) / SR)
    tail[:, :130] = 0
    tail[0, 0] = tail[1, 2] = 1
    return signal.fftconvolve(x, 0.83 * tail, axes=1)[:, :N]


def scene():
    mesh_hz = mesh()
    teeth = (np.cumsum(mesh_hz) / SR)[ON]
    mesh_hz = mesh_hz[ON]
    no_bass = signal.butter(8, 270, "high", fs=SR, output="sos")
    saw = signal.sosfilt(no_bass, motor(mesh_hz, teeth) + tear(teeth))
    shop = hands() + knob() + slides() + ticks() + bass(teeth, mesh_hz) + slaps()
    duck = nominal_scale(np.interp(T, [4.7, 4.9], [0, -25]))
    return room(whole(saw) + shop) + blade_song() + quiet() * duck


def band_limit(x):
    return signal.sosfilt(signal.butter(12, 15420, fs=SR, output="sos"), x)


# frequency in Hz, left minus right in dB.
PORTS = [(60, 1), (110, -5.5), (200, 3.5), (380, 2.5), (690, 4.5), (1280, 8), (2360, 6.5), (4360, 17),
         (8040, 23), (14800, -20)]


def record(dry):
    left = [(hz, 20 * np.log10(2 / (1 + nominal_scale(-db)))) for hz, db in PORTS]
    right = [(hz, 20 * np.log10(2 / (1 + nominal_scale(db)))) for hz, db in PORTS]
    ports = np.array([colour(v, tilt) for v, tilt in zip(dry, (left, right))])
    band = signal.firwin(511, EDGE_HZ, window=("kaiser", 9), fs=SR)
    ports = signal.oaconvolve(ports, band[None], "same")
    return band_limit(1.299 * np.tanh(ports / 1.274))


dry = scene()
out = record(dry)
bounce(out)
```